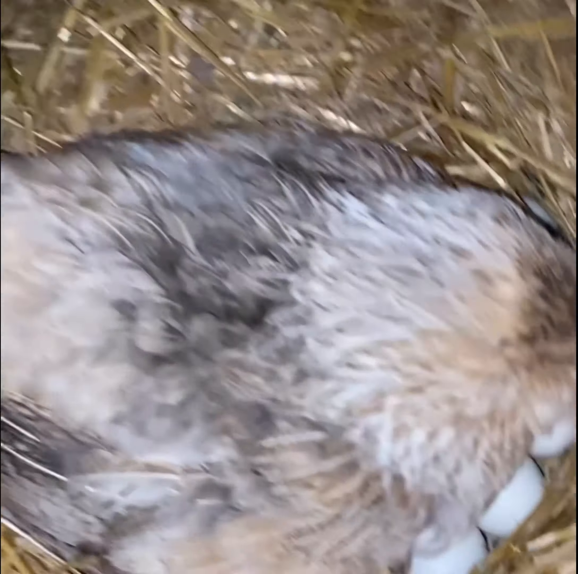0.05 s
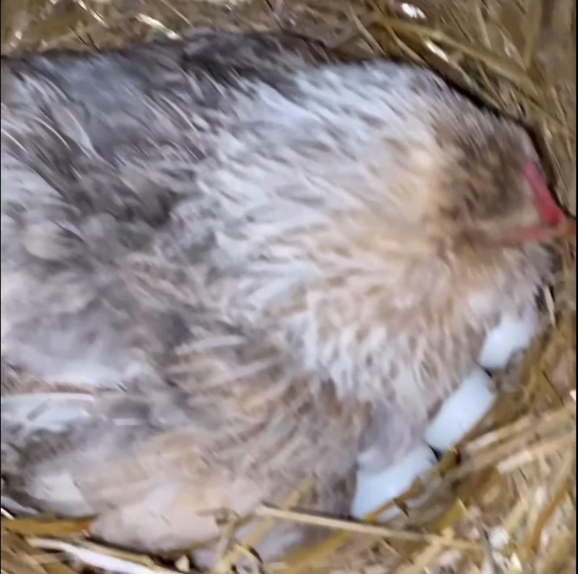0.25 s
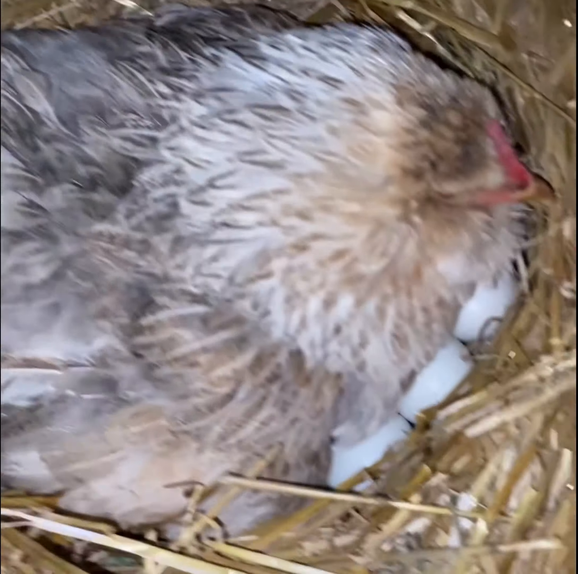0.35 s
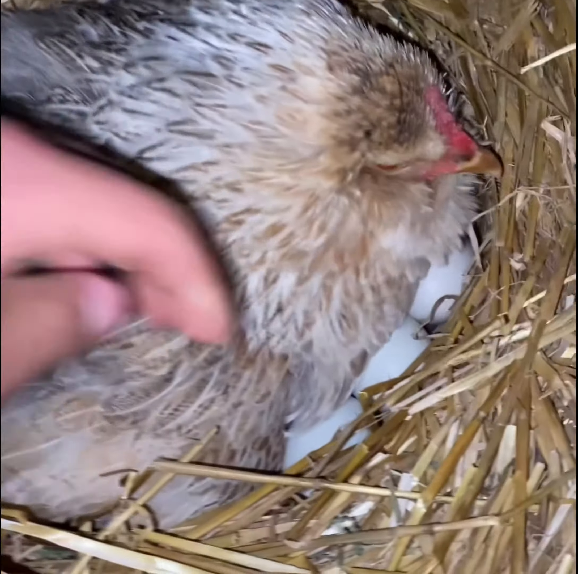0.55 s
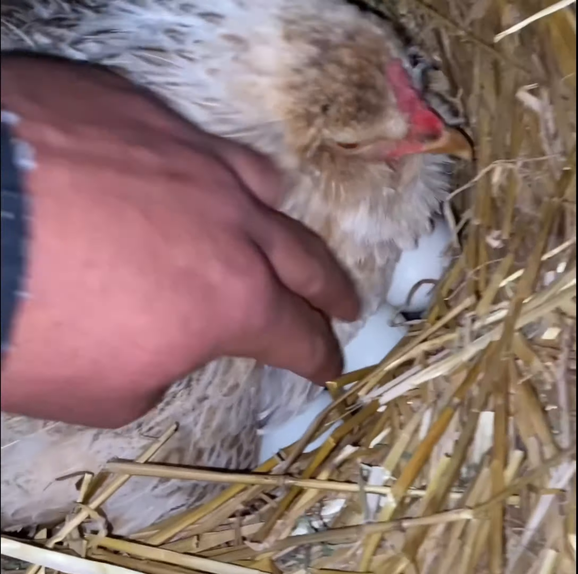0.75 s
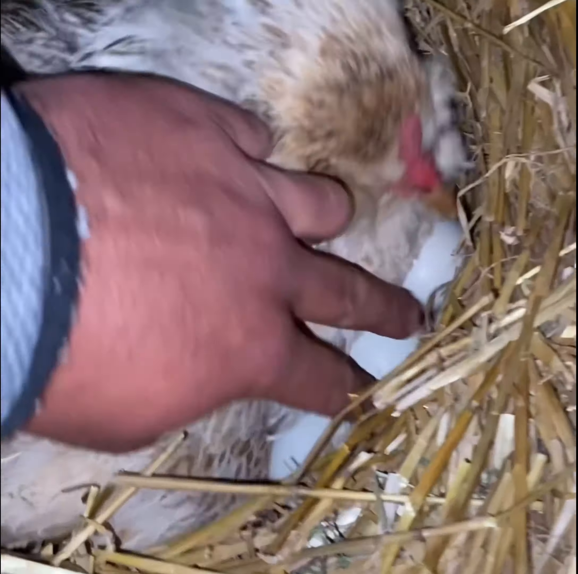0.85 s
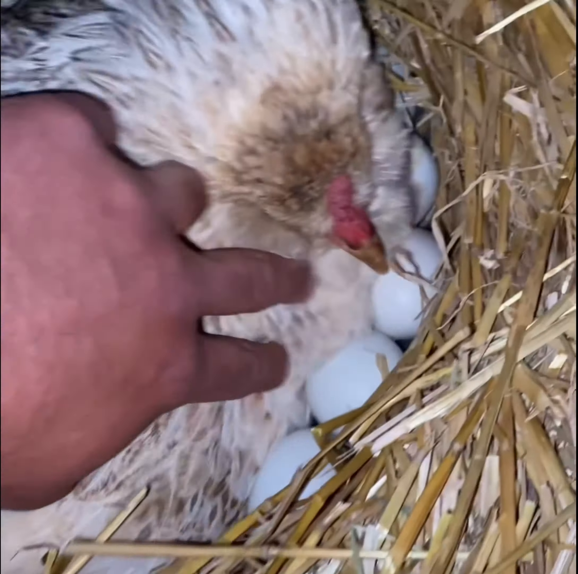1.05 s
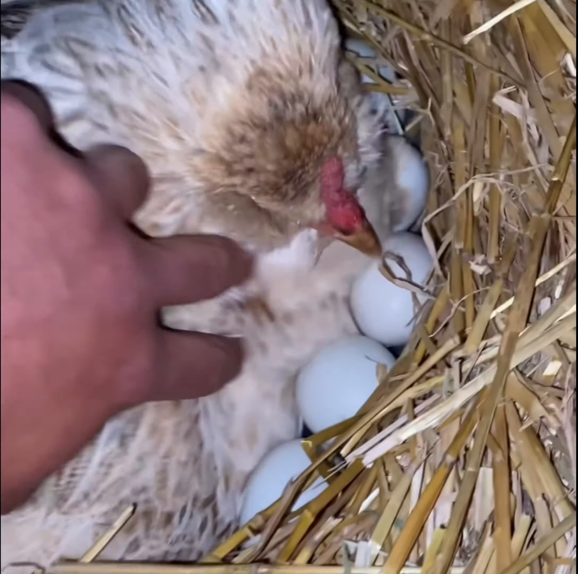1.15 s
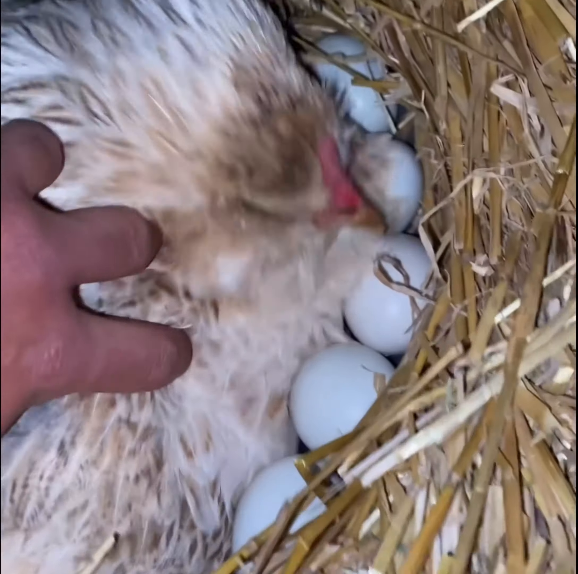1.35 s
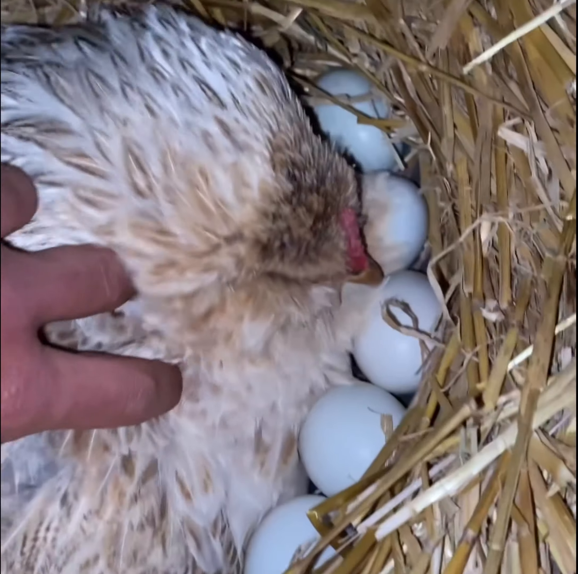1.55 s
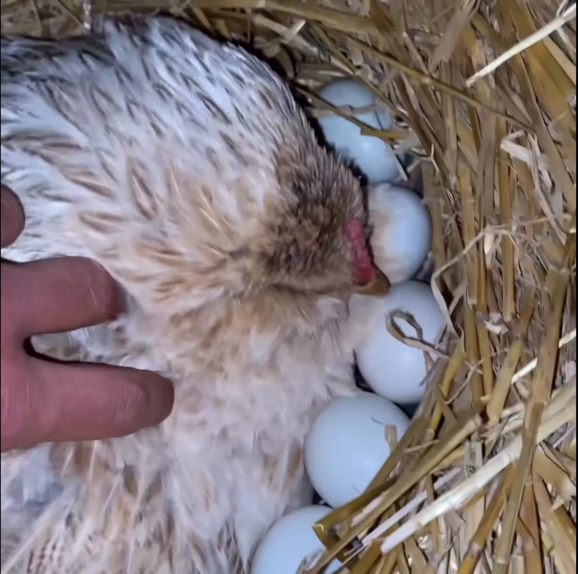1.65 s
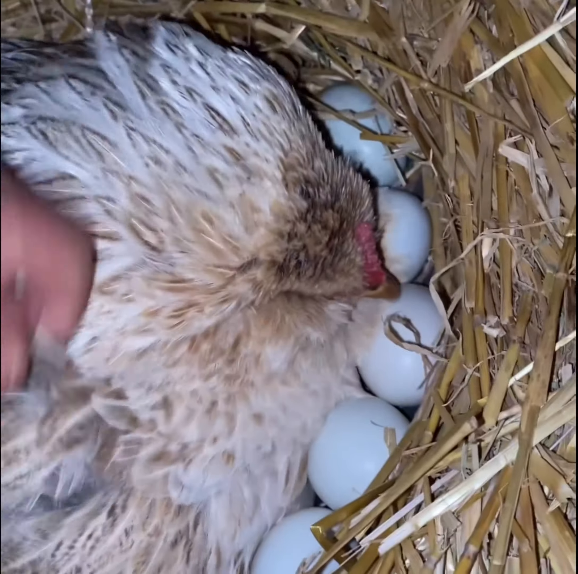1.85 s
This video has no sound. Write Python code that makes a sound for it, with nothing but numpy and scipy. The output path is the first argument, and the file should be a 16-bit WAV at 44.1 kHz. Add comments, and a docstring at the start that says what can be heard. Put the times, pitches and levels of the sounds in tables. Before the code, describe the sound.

A hen close to the microphone clucks and gives a short growl, then a longer fluttering growl and a few more clucks. Straw rustles softly under a hand, which lightly bumps the microphone, in a small coop.

```python
"""In a small coop, close by, a broody hen on a straw nest clucks and growls at a hand reaching under her.
Her voice is a source and a filter: pulses ring the throat's resonances, brighter as the beak opens.
Each cluck is a throat click and a few slow pulses; two of them run on into a fluttering growl.
Straw rustles and snaps in tiny impacts, the moving hand bumps the microphone,
and a small bird peeps far off over the quiet air of the yard."""
import sys
import numpy as np
from scipy import signal
from scipy.fft import rfft, irfft, next_fast_len
from scipy.io import wavfile
from scipy.ndimage import uniform_filter1d

SR = 44100
rng = np.random.default_rng(int(sys.argv[2]) if len(sys.argv) > 2 else 0)


def transcribe(signal):
    """Save signal, clipped to [-1, 1], as a 16-bit WAV file at the path in sys.argv[1]."""
    frames = np.atleast_2d(signal).T
    limited = np.clip(frames, -1, 1)
    pcm = np.round(limited * 32767).astype(np.int16)
    wavfile.write(sys.argv[1], SR, pcm)


N = 83790
TIME = np.arange(N) / SR

# throat clicks: t/s, level/dB, beak opening/dB
CLICKS = [(.185, -7, -25), (.545, -6, -20), (1.358, -7.5, 4), (1.6035, -5.5, -1.5), (1.6502, -7.5, 6),
          (1.8825, -7.5, -13)]
# clucks: t/s, length/s, first f/Hz, last f/Hz, level/dB, beak opening/dB
CLUCKS = [(0.206, 0.019, 245.3, 330.5, -1, -18.5), (0.5676, 0.02, 283.2, 285, 2, -31),
          (1.181, 0.013, 300.7, 264.5, -1, 0.5), (1.3748, 0.015, 205.7, 205, -0.5, 2.5),
          (1.6208, 0.0276, 245.8, 213.3, 0.5, 0), (1.663, 0.012, 266, 243, -15.5, -5)]
# growl contours: t/s, f/Hz, level/dB, beak opening/dB, flutter rate/Hz, flutter depth/dB
SHORT_GROWL = [(.232, 346, -12.5, -38, 48, -3), (.262, 304, -2, -26, 50.4, 20),
               (.295, 283.6, -1, -39, 53.3, 8.5), (.335, 258, -1.5, -24, 48.5, 19),
               (.36, 243, -7, -43, 43.5, 13), (.372, 241, -16, -26, 49, 18)]
LONG_GROWL = [(.59, 304, 4, -33, 54.53, 29), (.62, 303, 0, -35, 54.33, 2.2),
              (.655, 323, -5, -14, 56.45, 36), (.68, 426, 1, -20, 54.63, 16.5),
              (.715, 410, -3, -5, 54.07, 17.4), (.76, 481.4, -0.5, 2, 55.22, 21.6),
              (.8, 442, -4, 5.5, 54.27, 10.2), (.85, 460, -2.5, 6, 52.37, 8.5),
              (.89, 483, -1.5, 8.5, 53.7, 8.8), (.945, 420, 1, 6, 52.62, 8.4),
              (.99, 370, -1, 0, 52.16, 3.4), (1.08, 378, 2, 0.5, 50.77, 8),
              (1.165, 364, 1, -0.5, 47.62, 7.1), (1.19, 345, -2, 0, 45.57, 1.8),
              (1.204, 303, -28, -13, 46, 9.4)]
def hen():
    """Source-filter model: clicks, clucks and growls are pulse trains exciting one vocal tract."""
    clucks = [cluck(*row) for row in CLUCKS]
    short_pulses = growl(SHORT_GROWL, beat_s=.276, jitter=.14)
    long_pulses = growl(LONG_GROWL, beat_s=.81, jitter=.1)
    long_growl = shape(voice(long_pulses), lambda f: 1 - lowpass(f, hz=241, slope=8))
    short_calls = voice(np.vstack([CLICKS, *clucks, short_pulses]))
    return moving_formant(short_calls + long_growl) + hoarse_puffs()


def cluck(start, length, first_hz, last_hz, level_db, open_db):
    """Brief voicing: a few pulses swell and fade as the beak closes. Rows: t/s, level/dB, opening/dB."""
    arch_db, close_db, jitter = 1.5, 10, .028
    rows, t = [], 0
    for slip in rng.standard_normal(16):
        if t < length:
            u = t / length
            rows.append((start + t, level_db - arch_db * (2 * u - 1) ** 2, open_db - close_db * u ** 2))
            t += (1 + jitter * slip) / (first_hz + (last_hz - first_hz) * u)
    return np.array(rows)


def growl(contour, beat_s, jitter):
    """Amplitude modulation: each flutter beat, one centred on beat_s, is a burst of uneven pulses."""
    shimmer_db, sag = 1.5, .35
    s, *columns = np.transpose(contour)
    beats = np.cumsum(np.interp(TIME, s, columns[3])) / SR
    beat, cycle = np.mgrid[-20:21, -7:8]
    centre = np.interp(beat + np.interp(beat_s, TIME, beats), beats, TIME)
    hz, level_db, open_db, rate, depth_db = (np.interp(centre, s, c) for c in columns)
    slip, push = rng.standard_normal((2, *beat.shape))
    place = (cycle + jitter * slip) * rate / hz  # in beats from the burst's centre
    place *= np.exp(sag * place)  # the pitch falls within each burst
    times = centre + place / rate
    dip = np.sin(np.pi * place) ** 2
    pulse_db = level_db - depth_db * dip + shimmer_db * push
    rows = np.stack([times, pulse_db, open_db - (dip - .25)], axis=-1)  # brightest in mid-burst
    return rows[(abs(place) < .5) & (times > s[0]) & (times < s[-1])]


def voice(rows):
    """Radiation from the beak: the higher the band, the more it rises with the opening."""
    times, level_db, open_db = rows.T
    mid_hz, top_hz, shrill_hz = 673, 1690, 3400
    under = lambda f, hz: lowpass(f, hz, slope=6)
    train = lambda share: pulses(times, amp(level_db + share * open_db))
    drive = (shape(train(0), lambda f: under(f, mid_hz))
             + shape(train(.36), lambda f: under(f, top_hz) - under(f, mid_hz))
             + shape(train(1), lambda f: under(f, shrill_hz) - under(f, top_hz))
             + shape(train(1.88), lambda f: 1 - under(f, shrill_hz)))
    return amp(10.5) * throat(drive)


# formants of the throat: f/Hz, gain/dB
FORMANTS = [(60, -51), (130, -2), (200, 4.5), (300, 1), (385, 3.5), (450, 0), (545, 2), (610, -6), (685, 1),
            (760, 0.5), (860, -3.5), (1020, -4.5), (1350, -10), (1600, -24), (2000, -20.5), (2400, -18),
            (2950, -37.5), (3550, -31.5), (4200, -49.5), (4900, -39), (5450, -46), (6000, -37.5),
            (6900, -72), (16000, -96)]
def throat(drive):
    """Resonance with group delay: pulses and their air noise ring the throat, treble first."""
    size, bass_lag_s, knee_hz = 4096, .00257, 489
    half = size // 2 + 1
    hz = abs(np.fft.fftfreq(size, 1 / SR))
    log_gain = np.log(amp(read(FORMANTS, hz)))
    minimum_phase = np.exp(np.conj(signal.hilbert(log_gain)))[:half]
    lag = 2 * np.pi * bass_lag_s * knee_hz * np.arctan(hz[:half] / knee_hz)
    ring = irfft(minimum_phase * np.exp(-1j * lag))[:size // 2]
    breath = np.sqrt(abs(uniform_filter1d(drive ** 2, size=70))) * rng.standard_normal(N)
    rasp = amp(-19) * shape(breath, lambda f: (f / 673) ** .9)
    return signal.fftconvolve(drive + rasp, ring)[:N]


# path of one throat resonance: t/s, f/Hz
FORMANT_PATH = [(.36, 600), (.57, 896), (.7, 830), (.755, 970), (.8, 923), (.89, 997), (.986, 867),
                (1.14, 857), (1.38, 833), (1.63, 664)]
def moving_formant(x, width_hz=92, gain_db=-3):
    """A time-varying resonator reinforces a narrow, gliding band of the voice."""
    turn = np.exp(2j * np.pi * np.cumsum(np.interp(TIME, *np.transpose(FORMANT_PATH))) / SR)
    pole = np.exp(-np.pi * width_hz / SR)
    ring = turn * signal.lfilter([1 - pole], [1, -pole], x / turn + 1e-18)
    return x + amp(gain_db) * 2 * ring.real


# hoarse puffs: t/s, length/s, level/dB
PUFFS = [(0.367, 0.042, -48.5), (1.545, 0.039, -45)]
# their spectrum: f/Hz, level/dB
PUFF_SPECTRUM = [(100, -42), (300, -10), (450, 1), (800, 4.5), (1150, -9.5), (1600, -25), (3000, -30),
                 (12000, -60)]
def hoarse_puffs():
    """Unvoiced excitation: the hen's breath is filtered noise that swells and fades."""
    swell = sum(amp(db) * np.sqrt(abs(arch(s, length))) for s, length, db in PUFFS)
    return swell * coloured(rng.standard_normal(N), PUFF_SPECTRUM)


# rustle envelope: t/s, level/dB
RUSTLE = [(0, -59), (.18, -58.5), (.3, -57.5), (.48, -65), (.6, -56.5), (.72, -53), (.82, -57), (.9, -73),
          (1.15, -63.5), (1.3, -62.5), (1.5, -91), (1.9, -87)]
# rustle spectrum: f/Hz, level/dB
STRAW_SPECTRUM = [(200, 24.5), (800, -5), (2000, 12.5), (4500, 10), (11000, 6.5), (15500, 9.5)]
# crunches under the hand: t/s, length/s, level/dB
CRUNCHES = [(0.348, 0.054, -74), (0.75, 0.11, -49.5)]
def straw_friction():
    """Shot noise: stalks rub in fine random grains and crunch in sparser, brighter ones."""
    grains = impacts(per_s=2500) * amp(2 * np.minimum(rng.exponential(1, N), 4))
    rustle = coloured(grains, STRAW_SPECTRUM) * amp(np.interp(TIME, *np.transpose(RUSTLE)))
    press = sum(amp(db) * arch(s, length) for s, length, db in CRUNCHES)
    crunch = unit(shape(impacts(per_s=250), lambda f: 1 - lowpass(f + 1, hz=8000, slope=4)))
    return rustle + press * crunch


# snapping stalks: t/s, peak level/dB, centre f/Hz
SNAPS = [(.285, -44, 2270), (0.291, -33, 2120), (.369, -44, 11700), (.409, -38, 11700), (.522, -44, 4830),
         (0.571, -37, 2640), (.571, -39, 4600), (0.5706, -42, 12000), (.765, -33, 12400),
         (0.777, -38.5, 11400), (0.809, -26.5, 10900), (0.819, -44, 12200), (0.825, -29.5, 12400),
         (.865, -42.5, 12600), (1.358, -46.5, 11200), (1.392, -41.5, 10700)]
def straw_snaps(decay_s=.0008, log_width=.38):
    """Brittle fracture: each stalk releases a fast-decaying burst of noise in one band."""
    out, t = np.zeros(N), TIME[:1024]
    for s, db, hz in SNAPS:
        burst = rng.standard_normal(len(t)) * np.exp(-t / decay_s)
        edges = hz * np.exp(log_width * np.array([-.5, .5]))
        crack = signal.lfilter(*signal.butter(2, edges, "band", fs=SR), burst)
        add(out, s, amp(db) * crack / abs(crack).max())
    return out


# knocks of the hand: t/s, f/Hz, level/dB, decay time/s
BUMPS = [(0.43, 77.4, -34.5, 0.026), (0.453, 62.7, -23, 0.017), (0.526, 79, -30.5, 0.025),
         (.543, 72.6, -20, 0.015), (0.602, 80.3, -32, 0.054), (0.653, 58.6, -33, 0.032),
         (0.797, 63.6, -31, 0.017)]
def bumps(rise_s=.0027):
    """Damped oscillation: soft knocks set the microphone's housing swinging for a few cycles."""
    out, t = np.zeros(N), TIME[:SR // 4]
    for s, hz, db, decay in BUMPS:
        swing = (1 - np.exp(-(t / rise_s) ** 2)) * np.exp(-t / decay)
        add(out, s, -amp(db) * swing / swing.max() * np.sin(2 * np.pi * hz * t))
    return out


# distant peeps: t/s, length/s, first f/Hz, middle f/Hz, last f/Hz, level/dB
PEEPS = [(-.012, 0.033, 3900, 4120, 4950, -45.5), (0.021, 0.053, 5650, 5930, 5730, -59.5),
         (0.205, 0.1, 4800, 5480, 4590, -55), (0.326, 0.057, 5100, 5460, 5340, -67),
         (1.052, 0.0404, 4140, 4530, 4820, -52.5), (1.085, 0.056, 5000, 5180, 4930, -58.5)]
def bird():
    """Frequency modulation: each thin whistle wavers about a parabolic glide."""
    out = np.zeros(N)
    for s, length, first_hz, middle_hz, last_hz, db in PEEPS:
        u = np.arange(0, length, 1 / SR) / length
        hz = np.polyval(np.polyfit([0, .5, 1], [first_hz, middle_hz, last_hz], 2), u)
        hz *= 1 + .013 * wobble(hz=346)[:len(u)]
        add(out, s, amp(db) * np.sin(np.pi * u) * np.sin(2 * np.pi * np.cumsum(hz) / SR))
    return out * (1 + .58 * wobble(hz=152))


# yard background: f/Hz, level/dB
AIR_SPECTRUM = [(15, -25), (30, -7), (70, 4), (140, -3), (300, -7), (600, -9), (1000, -11.5), (2000, -22),
                (5000, -29.5), (11000, -27), (16000, -38)]
# left-right coherence of diffuse sound: f/Hz, coherence (0-1)
COHERENCE = [(50, 1), (300, 0.71), (1000, 0.12), (4000, 0.08), (16000, 0.2)]
def yard_air():
    """A diffuse field: quiet noise, nearly alike in both channels at long wavelengths."""
    left, other = rng.standard_normal((2, N))
    same = lambda f: read(COHERENCE, f)
    right = shape(left, same) + shape(other, lambda f: np.sqrt(1 - same(f) ** 2))
    return amp(-55.5) * coloured(np.array([left, right]), AIR_SPECTRUM)


# wall reflections: delay/s, gain
ECHOES = [(.0033, 0.47), (.0079, 0.066), (0.0147, 0.092), (0.0196, 0.084)]
# reverberation time: f/Hz, T60/s
COOP_T60 = [(150, 0.19), (500, 0.2), (1500, 0.087), (5000, 0.23), (12000, 0.031)]
def coop(x, wet_db, lag_s):
    """Reflection and reverberation: direct sound and echoes arrive left first; a diffuse tail follows."""
    delay = lambda f, s: np.exp(-2j * np.pi * f * s)
    left = shape(x, lambda f: 1 + sum(gain * delay(f, s) for s, gain in ECHOES))
    right = shape(left, lambda f: delay(f, lag_s))
    hz, t, noise = signal.stft(rng.standard_normal((3, SR // 2)), SR, nperseg=256)
    decay = amp(-60 * t / read(COOP_T60, hz)[:, None]) * (t > .004)
    tails = signal.istft(noise * decay, SR)[1]
    common = shape(tails[-1], lambda f: np.sqrt(read(COHERENCE, f)))
    tail = common + shape(tails[:2], lambda f: np.sqrt(1 - read(COHERENCE, f)))
    wet = signal.fftconvolve(x[None], tail / np.linalg.norm(tail[0]), axes=1)[:, :N]
    return np.array([left, right]) + amp(wet_db) * wet


def amp(db):
    """Decibels to amplitude ratio."""
    return 10 ** (np.asarray(db) / 20)


def unit(x):
    """Normalisation to rms 1."""
    return x / np.sqrt(np.mean(x ** 2) + 1e-20)


def read(points, hz):
    """Interpolation on a log-frequency axis."""
    f, value = np.transpose(points)
    return np.interp(np.log(hz + 1), np.log(f + 1), value)


def add(mix, s, sound):
    """Superposition of a sound starting at time s."""
    at = round(s * SR)
    sound = sound[max(-at, 0):]
    part = mix[max(at, 0):][:len(sound)]
    part += sound[:len(part)]


def shape(x, response):
    """Filtering as multiplication of the spectrum by a response."""
    size = next_fast_len(2 * x.shape[-1])
    return irfft(rfft(x, size) * response(np.fft.rfftfreq(size, 1 / SR)), size)[..., :x.shape[-1]]


def coloured(x, spectrum):
    """Spectral weighting by a table, at rms 1."""
    return unit(shape(x, lambda f: amp(read(spectrum, f))))


def lowpass(f, hz, slope):
    """Power-law roll-off above hz."""
    return 1 / (1 + (f / hz) ** slope)


def arch(s, length):
    """Half-sine envelope."""
    return np.sin(np.pi * np.clip((TIME - s) / length, 0, 1))


def wobble(hz):
    """Random drift: low-passed noise."""
    return unit(shape(rng.standard_normal(N), lambda f: lowpass(f, hz, slope=4)))


def impacts(per_s):
    """Poisson impulses of random size."""
    return (rng.random(N) < per_s / SR) * rng.standard_normal(N)


def pulses(times, sizes):
    """Band-limited impulses at exact times."""
    out = np.zeros(N + 64)
    for s, size in zip(times, sizes):
        at = np.clip(int(s * SR) + np.arange(-8, 9), 0, N + 1)
        out[at] += size * np.sinc(at - s * SR) * np.hanning(len(at))
    return out[:N]


# the hen's level difference, left minus right: f/Hz, level/dB
HEN_BALANCE = [(125, -4.5), (260, -3), (500, -0.5), (1000, .5), (2100, -1.5), (4000, -4.5), (10000, 8.5)]
def scene():
    """Superposition: hen, straw and bird sound through the coop; bumps and air add directly."""
    call = coop(hen(), wet_db=-12, lag_s=28e-6)
    call = shape(call, lambda f: amp(np.outer([.5, -.5], read(HEN_BALANCE, f))))
    nest = coop(straw_friction() + straw_snaps(), wet_db=-15, lag_s=18e-6)
    peeps = coop(bird(), wet_db=-7.5, lag_s=28e-6)
    return call + nest + peeps + bumps() + yard_air()


def record(dry):
    """Band limiting by a linear-phase low-pass filter."""
    edge_hz = 15950
    taps = signal.firwin(511, edge_hz, window=("kaiser", 9), fs=SR)
    return signal.oaconvolve(dry, taps[None], "same")


dry = scene()
out = record(dry)
transcribe(out)
```